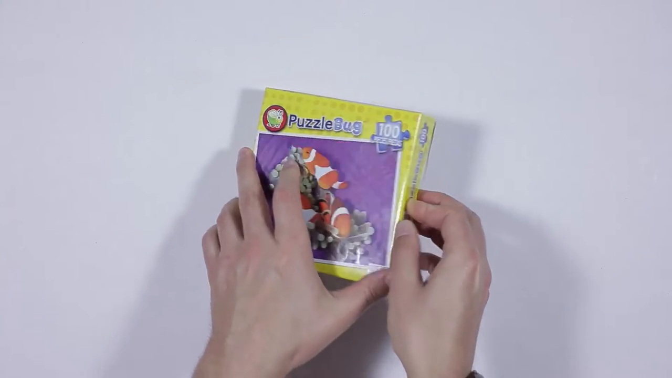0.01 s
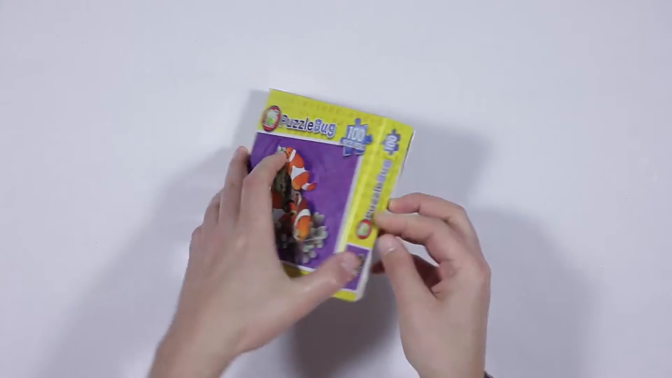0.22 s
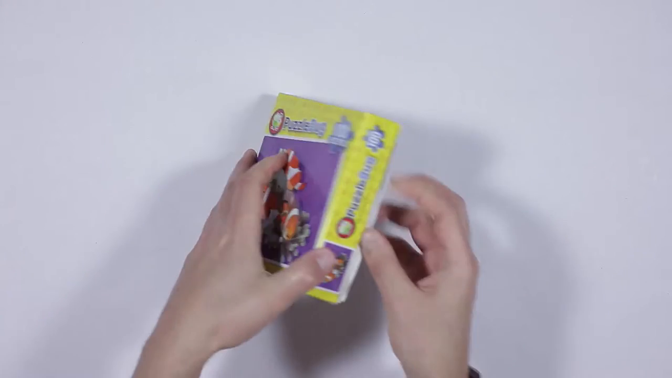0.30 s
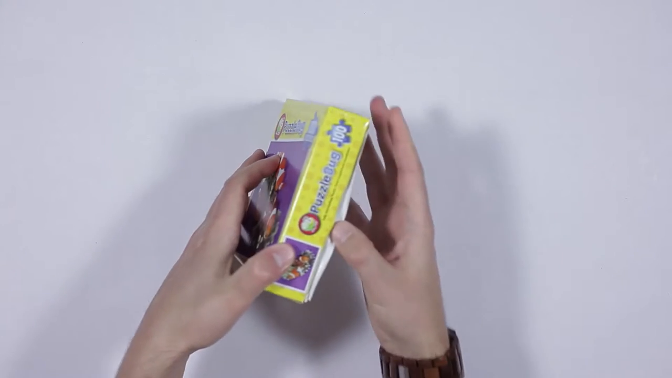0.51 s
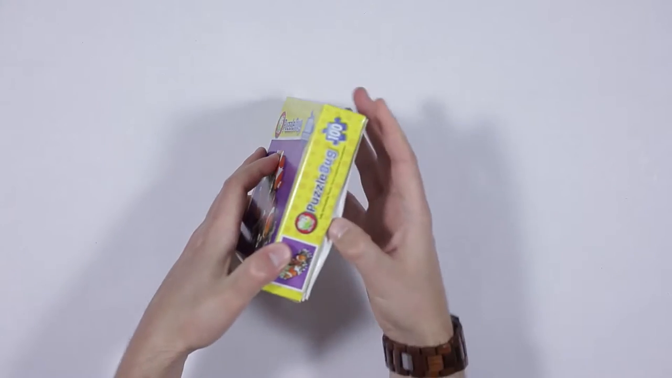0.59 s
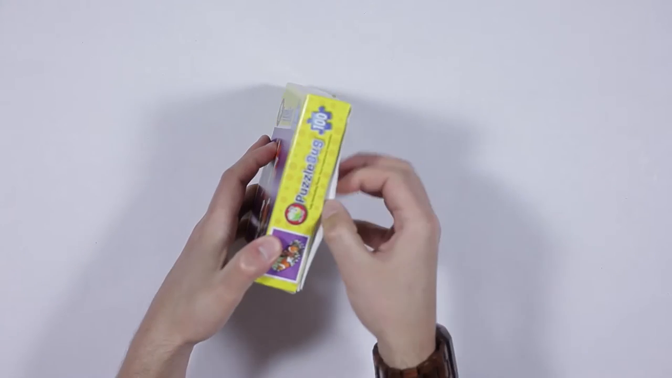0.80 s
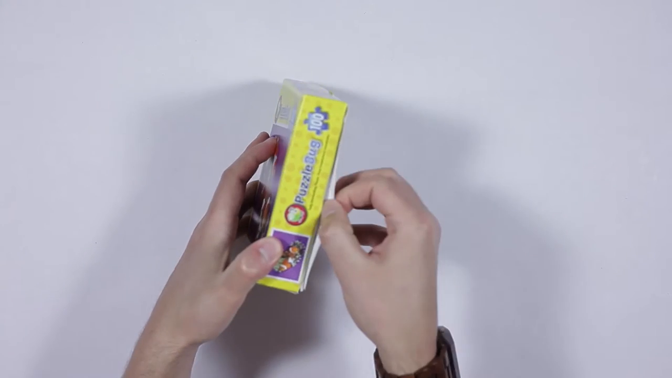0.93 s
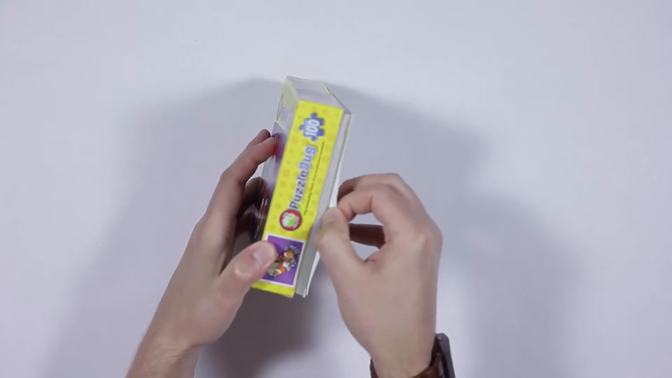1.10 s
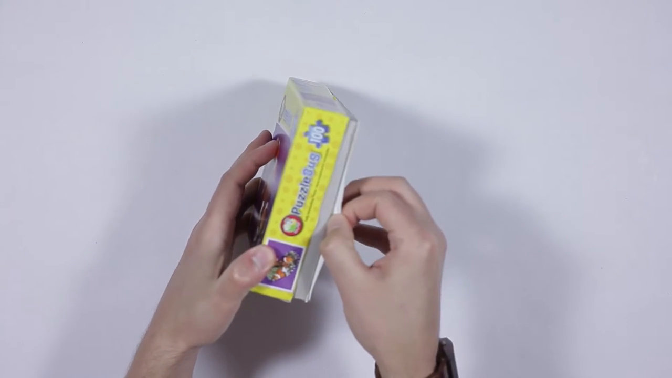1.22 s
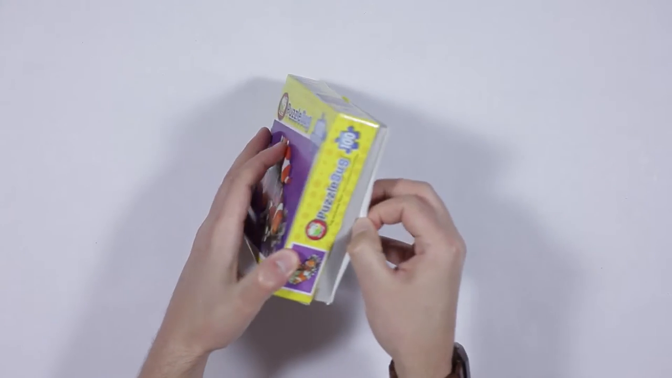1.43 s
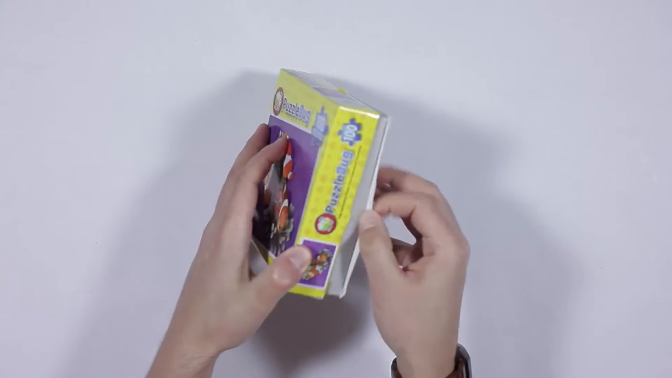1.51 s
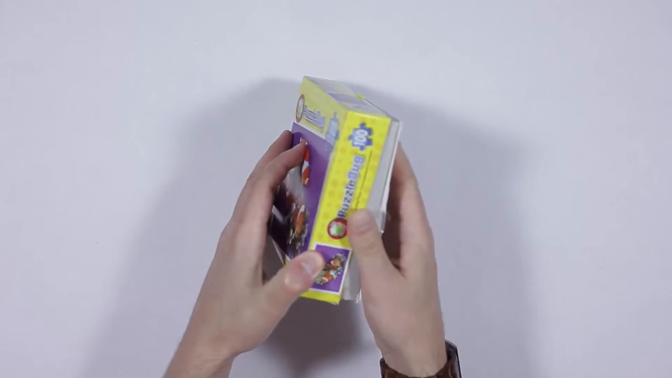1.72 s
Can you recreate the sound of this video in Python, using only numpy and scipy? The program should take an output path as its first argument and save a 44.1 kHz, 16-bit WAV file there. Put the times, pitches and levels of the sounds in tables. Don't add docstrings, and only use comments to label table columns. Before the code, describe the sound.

Close and dry with slight room echo, fingers rub a hollow cardboard box, its tab pops loudly, loose pieces slide and knock inside, then sparse gentle grip shifts and one small click with a soft thump.

```python
import sys
import numpy as np
from scipy import signal
from scipy.fft import rfft, irfft, next_fast_len
from scipy.io import wavfile
from scipy.ndimage import map_coordinates

SR = 44100
rng = np.random.default_rng(int(sys.argv[2]) if len(sys.argv) > 2 else 0)


def ratio_of_db(decibels):
    return 10 ** (np.asarray(decibels, float) / 20)


def store_wav(level_fs):
    pcm = np.round(np.clip(np.atleast_2d(level_fs), -1, 1) * 32767)
    wavfile.write(sys.argv[1], SR, pcm.T.astype(np.int16))


N = 77175


def unit(x):
    return x / np.sqrt(np.mean(x ** 2) + 1e-20)


def along(points, hz):
    point_hz, value = np.transpose(points)
    return np.interp(np.log(hz + 1), np.log(point_hz + 1), value)


def filtered(x, response):
    size = next_fast_len(len(x) + 8192)
    spectrum = rfft(x, size) * response(np.fft.rfftfreq(size, 1 / SR))
    return irfft(spectrum, size)[:len(x)]


def resonances(peaks):
    def response(f):
        total = 0
        for k, (hz, width_hz, level_db) in enumerate(peaks):
            ring = 1j * f * width_hz / (hz * hz - f * f + 1j * f * width_hz)
            total = total + (-1) ** k * ratio_of_db(level_db) * ring
        return total
    return response


def grit(depth_db, rate_hz):
    knots = rng.standard_normal(N)
    stutter_db = depth_db * map_coordinates(knots, [np.arange(N) * rate_hz / SR])
    return unit(ratio_of_db(stutter_db) * rng.standard_normal(N))


def stroke(start_s, rise_s, level_db, fade_s):
    t = np.arange(N) / SR - start_s
    rise = np.sin(np.pi / 2 * np.clip(t / rise_s, 0, 1)) ** 2
    return ratio_of_db(level_db - 60 * np.clip(t - rise_s, 0, None) / fade_s) * rise


# pitch_hz [Hz], width_hz [Hz], level_db [dB]
TAB_RINGS = [(1550, 180, -9), (2700, 490, 2), (4950, 640, 1), (6100, 720, 1), (7370, 640, 3),
             (8670, 830, 0), (10100, 700, -0.5), (11700, 1100, -2), (14800, 1300, -6)]


def snap():
    start_s, level_db, box_db = .2316, 1.6, -27
    t = np.arange(N) / SR - start_s
    crackle = .06 * ratio_of_db(-60 * np.abs(t) / .014)
    tail = ratio_of_db(-32 - 60 * np.abs(t) / .06)
    drive = (t > 0) * rng.standard_normal(N) * (crackle + tail)
    drive[round(start_s * SR)] = -1
    crack = filtered(drive, resonances(TAB_RINGS))
    knock = box_ring(drive)
    return ratio_of_db(level_db) * (crack / np.abs(crack).max() + ratio_of_db(box_db) * knock / np.abs(knock).max())


# pitch_hz [Hz], width_hz [Hz], level_db [dB]
BOX_LOW_RINGS = [(293.6, 61, -9.5), (390, 53, -6), (445, 70, -2.5), (620, 70, -3.5), (775, 58.6, 1),
                 (901, 32, -2), (1080, 202, -6)]
# pitch_hz [Hz], width_hz [Hz], level_db [dB]
BOX_HIGH_RINGS = [(1405, 66, -1), (1552, 27, 0), (1720, 160, -3), (2410, 320, -3.5), (2796, 594, -7),
                  (4660, 690, -12.5)]


def box_ring(blow):
    return filtered(blow, resonances(BOX_LOW_RINGS + BOX_HIGH_RINGS))


# start_s [s], rise_s [s], level_db [dB], fade_s [s to drop 60 dB], brightness_db [dB]
TUMBLES_IN_BOX = [(-.02, 0.037, -52, 1, -2.5), (0.102, 0.15, -54, 0.84, 2.5),
                  (0.231, 0.0066, -35.5, 0.079, 10.5), (0.241, 0.015, -37, 0.93, -0.5),
                  (0.299, 0.012, -38, 0.3, 5.5), (.325, 0.029, -38, 0.27, -4),
                  (.375, 0.029, -39.5, 0.2, -25), (0.431, 0.04, -52, 0.29, -26),
                  (0.5063, 0.0017, -43.5, 0.43, -6), (0.527, 0.0035, -48, 0.11, -5),
                  (0.539, 0.0017, -44, 0.11, -2), (0.559, 0.0057, -50, 0.28, -13),
                  (0.687, 0.013, -59.5, 0.46, 6.5), (0.881, 0.0093, -52.5, 0.5, 1),
                  (1.0, 0.019, -56.5, 1, -2.5), (1.087, 0.009, -51.5, 1, -2.5),
                  (1.15, 0.05, -60, 0.15, 6.5), (1.259, 0.027, -54, 1, 0.5),
                  (1.329, 0.0029, -47.5, 0.23, 2), (1.383, 0.017, -46, 0.18, -2),
                  (1.409, 0.0044, -49.5, 0.49, 1), (1.461, 0.0017, -47, 0.13, 9.5),
                  (1.544, 0.0025, -54, 0.36, 0.5), (1.61, 0.056, -56, 0.73, -2.5),
                  (1.711, 0.0023, -52, 0.098, 0)]


def pieces():
    low = unit(filtered(grit(2, 300), resonances(BOX_LOW_RINGS)))
    high = unit(filtered(grit(2, 500), resonances(BOX_HIGH_RINGS)))
    power = np.array([stroke(*tumble[:4]) ** 2 for tumble in TUMBLES_IN_BOX])
    brightness = ratio_of_db(2 * np.array(TUMBLES_IN_BOX)[:, -1])
    return low * np.sqrt(power.sum(0)) + high * np.sqrt(brightness @ power)


# start_s [s], rise_s [s], level_db [dB], fade_s [s to drop 60 dB], pitch_hz [Hz]
NARROW_HUMS = [(.245, 0.0079, -37, 0.37, 782), (0.311, 0.032, -39, 0.23, 620), (0.526, 0.01, -41, 0.055, 450),
               (.61, 0.017, -53, 0.083, 700), (0.887, 0.017, -56, 0.17, 390), (0.99, 0.025, -60, 0.25, 445),
               (1.09, 0.03, -51.5, 0.14, 459), (1.328, 0.0067, -56, 0.15, 775), (1.385, 0.01, -50, 0.17, 796),
               (1.405, .008, -53, 0.11, 1405), (1.61, .01, -55.5, 0.058, 765), (1.645, 0.0051, -60, .09, 440),
               (1.685, 0.01, -55.5, .2, 776), (.34, 0.023, -46, .15, 533), (0, .02, -58, 0.17, 450),
               (1.652, .006, -54, .12, 4850), (1.085, .025, -51, .15, 8000), (1.578, .008, -52, .05, 8700),
               (1.328, .004, -50, .1, 1180), (1.33, .006, -51, .1, 1750), (.695, .004, -56, .05, 4000)]


def walls():
    rub, out = grit(2, 200), np.zeros(N)
    for start_s, rise_s, level_db, fade_s, pitch_hz in NARROW_HUMS:
        width_hz = 64 * max(1, pitch_hz / 900)
        wall = resonances([(pitch_hz, width_hz, 0)])
        hum = unit(filtered(rub, lambda f: wall(f) ** 2))
        out += stroke(start_s, rise_s, level_db, fade_s) * hum
    return out


# start_s [s], rise_s [s], level_db [dB], fade_s [s to drop 60 dB], pitch_hz [Hz]
WALL_KNOCKS = [
    (.529, .004, -38, .06, 470),
    (.5405, .003, -37, .08, 445),
    (1.329, .004, -45, .12, 778),
    (1.395, .006, -46, .1, 800),
    (1.461, .002, -42, .04, 1700),
    (.255, .004, -32, .08, 760),
    (.2335, .003, -26, .06, 1540),
]


def knocks():
    t, out = np.arange(N) / SR, np.zeros(N)
    for start_s, rise_s, level_db, fade_s, pitch_hz in WALL_KNOCKS:
        note = np.sin(2 * np.pi * pitch_hz * (t - start_s))
        out += stroke(start_s, rise_s, level_db, fade_s) * note
    return out


# start_s [s], rise_s [s], level_db [dB], fade_s [s to drop 60 dB], sheen_hz [Hz]
FINGER_RUBS = [(-.02, 0.027, -48, 0.78, 7000), (.04, 0.062, -55, 0.3, 7000), (.175, 0.01, -54, 1, 7240),
               (0.232, 0.0053, -32, 0.31, 5800), (.25, 0.032, -37, 0.25, 7000),
               (.32, 0.051, -47.5, 0.16, 5630), (0.371, 0.03, -48.5, 0.042, 6200),
               (.51, 0.039, -61.5, .12, 7760), (0.686, 0.0072, -47, 0.13, 7850),
               (0.704, 0.011, -47.5, 0.19, 6550), (.77, 0.041, -63.5, 0.47, 10100),
               (.884, 0.005, -49.5, 0.22, 6550), (0.952, .012, -53.5, 0.83, 11300),
               (1.0, 0.085, -51, 0.18, 6870), (1.079, 0.045, -45.5, 0.2, 7600),
               (1.149, 0.046, -50.5, 0.07, 8200), (1.261, 0.0072, -50, 0.67, 8100),
               (1.315, 0.016, -46, 0.05, 8100), (1.404, 0.013, -47, 0.65, 5850),
               (1.4608, 0.001, -31.5, 0.025, 11300), (1.46, 0.0015, -40.5, 0.15, 4900),
               (1.48, 0.028, -78, 0.17, 5000), (1.578, 0.0095, -49, 0.038, 9100),
               (1.61, 0.022, -52, 0.37, 7000), (1.645, 0.012, -49.5, 0.12, 5600)]
# pitch_hz [Hz], level_db [dB]
CARD_COLOUR = [(1500, -17), (3000, -8.5), (5000, -4.5), (9000, -2.5), (10500, 0.5), (15000, -11),
               (20000, -46)]


def fingers():
    slips, out = grit(2.5, 400), np.zeros(N)
    card_hz, sheen_width_hz, sheen_db = 7000, 2700, -7.5
    for start_s, rise_s, level_db, fade_s, sheen_hz in FINGER_RUBS:
        def colour(f):
            card = ratio_of_db(along(CARD_COLOUR, f * np.sqrt(card_hz / sheen_hz)))
            return card + ratio_of_db(sheen_db) / (1 + (2 * (f - sheen_hz) / sheen_width_hz) ** 4)
        out += stroke(start_s, rise_s, level_db, fade_s) * unit(filtered(slips, colour))
    return out


# start_s [s], peak_db [dB], pitch_hz [Hz]
EDGE_TICKS = [(0.0196, -30.5, 7300), (0.1016, -32.5, 11000), (0.124, -37, 8700), (0.1726, -29.5, 7370),
              (.2805, -19, 7200), (0.3072, -26, 5200), (0.31, -25.5, 1920), (0.3298, -14.5, 7600),
              (0.5092, -37.5, 2700), (0.5289, -40, 2280), (.5305, -46, 5200), (0.5413, -34.5, 2670),
              (0.5594, -46, 3500), (0.6174, -51, 7000), (.631, -45.5, 8100), (0.6796, -47, 6370),
              (0.696, -41.5, 5460), (0.889, -41, 1590), (1.0967, -31, 7500), (1.2682, -46, 9200),
              (1.282, -37.5, 2900), (1.329, -37, 1460), (1.332, -41, 2210), (1.347, -38, 10800),
              (1.394, -39, 2270), (1.4093, -33.5, 3370), (1.4615, -22.5, 5500), (1.4616, -18, 10700),
              (1.5475, -36.5, 2940), (1.5477, -36.5, 5760), (1.6545, -38, 4850), (1.658, -43, 6100),
              (1.687, -39, 2330), (1.688, -44, 6500), (1.712, -41, 2470)]


def ticks():
    out, t = np.zeros(N), np.arange(1024) / SR
    fade = ratio_of_db(-60 * t / 0.0067) + ratio_of_db(-14.5 - 60 * t / 0.07)
    for start_s, peak_db, pitch_hz in EDGE_TICKS:
        own = resonances([(pitch_hz, pitch_hz / 3, 0)])
        broad = resonances([(np.sqrt(4000 * pitch_hz), 5000, 0)])
        puff = rng.standard_normal(len(t)) * fade
        ring = filtered(puff, lambda f: own(f) ** 2 + ratio_of_db(-10.5) * broad(f) ** 3)
        out[round(start_s * SR):][:len(t)] += ratio_of_db(peak_db) * ring / np.abs(ring).max()
    return out


# start_s [s],
# peak_db [dB], pitch_hz [Hz], box_ring_db [dB]
CARD_TAPS = [(.2316, -18, 12500, -32), (.3087, -24.5, 3500, -6.5), (0.3191, -28.5, 2500, -3),
             (0.3303, -21.5, 5970, -14), (.408, -33, 3520, -11), (0.5083, -36.5, 3480, -5.5),
             (0.5297, -38, 3000, -1), (0.5404, -34.5, 5000, -2), (0.6903, -46, 5000, -12),
             (.696, -43, 4000, -10), (.8855, -44, 4500, 0), (1.3277, -40, 2500, -2),
             (1.5475, -33, 5500, -6), (1.7119, -44, 2500, -1)]


def taps():
    out, t = np.zeros(N), np.arange(4096) / SR
    for start_s, peak_db, pitch_hz, box_db in CARD_TAPS:
        chatter = 0.37 * rng.standard_normal(len(t)) * ratio_of_db(-60 * t / 0.0036)
        blow = chatter - (t == 0)
        card = resonances([(pitch_hz, 1.3 * pitch_hz, 0)])
        click = filtered(blow, lambda f: card(f) ** 2)
        ring = box_ring(blow)
        tap = ratio_of_db(peak_db) * (click / np.abs(click).max() + ratio_of_db(box_db) * ring / np.abs(ring).max())
        first = round(start_s * SR)
        out[first:first + len(t)] += tap[:N - first]
    return out


# pitch_hz [Hz], level_db [dB], fade_s [s to drop 60 dB]
PALM_NOTES = [(70, -50, 0.17), (132, -50, 0.27), (172, -51, 0.17), (261, -48, 0.29), (462, -45.5, 0.092),
              (536.5, -43, 0.14)]


def thump():
    start_s, rise_s = 1.46, 0.0021
    t, out = np.arange(N) / SR - start_s, np.zeros(N)
    for pitch_hz, level_db, fade_s in PALM_NOTES:
        out += stroke(start_s, rise_s, level_db, fade_s) * np.sin(2 * np.pi * pitch_hz * t)
    return out


# pitch_hz [Hz], fade_s [s to drop 60 dB]
ROOM_FADES = [(200, 0.51), (2000, 0.39), (10000, 0.16)]


def room(x):
    hz, t, z = signal.stft(rng.standard_normal(SR // 2), SR, nperseg=256)
    fade = ratio_of_db(-60 * t / along(ROOM_FADES, hz)[:, None])
    tail = signal.istft(z * fade, SR, nperseg=256)[1]
    late = np.pad(x, (150, 0))
    return signal.fftconvolve(late, tail / np.linalg.norm(tail))[:N]


# pitch_hz [Hz], level_db [dB per Hz]
AIR_COLOUR = [(15, -8.5), (25, -2.5), (36, -20.5), (150, -25.5), (500, -24.5), (3000, -39), (8500, -37),
              (16000, -39)]
# pitch_hz [Hz], level_db [dB]
HUM_NOTES = [(62, -72.5), (122, -73.5)]


def air():
    t = np.arange(N) / SR
    hiss = unit(filtered(rng.standard_normal(N), lambda f: ratio_of_db(along(AIR_COLOUR, f))))
    hum = sum(ratio_of_db(level_db) * np.sin(2 * np.pi * pitch_hz * t) for pitch_hz, level_db in HUM_NOTES)
    return ratio_of_db(-58) * hiss + hum


def scene():
    box = snap() + pieces() + walls() + knocks() + thump()
    hands = fingers() + ticks() + taps()
    near = box + hands
    return (near + ratio_of_db(-14.5) * room(near) + air())[None]


def roll_off(x):
    return signal.sosfilt(signal.butter(12, 16410, fs=SR, output="sos"), x)


def record(dry):
    def step(f, hz, width_hz):
        return (1 + np.tanh((f - hz) / width_hz)) / 2

    def capsule(f):
        return ratio_of_db(-7.5 * step(f, 9300, 550) - 30 * step(f, 16000, 250))

    heard = filtered(dry[0], capsule)
    return roll_off(heard[None])


dry = scene()
out = record(dry)
store_wav(out)
```